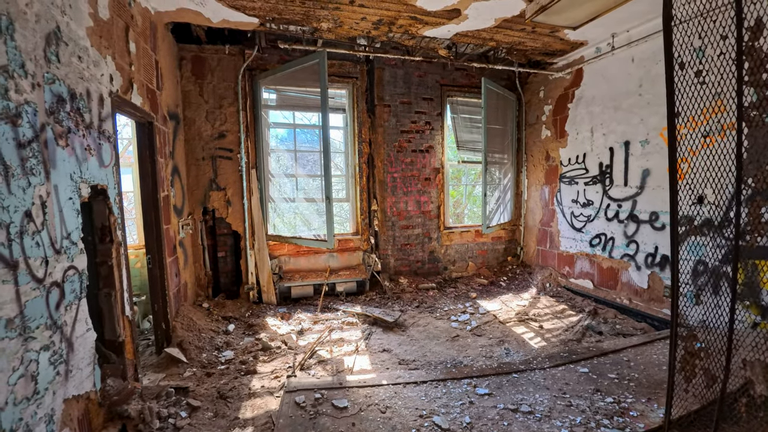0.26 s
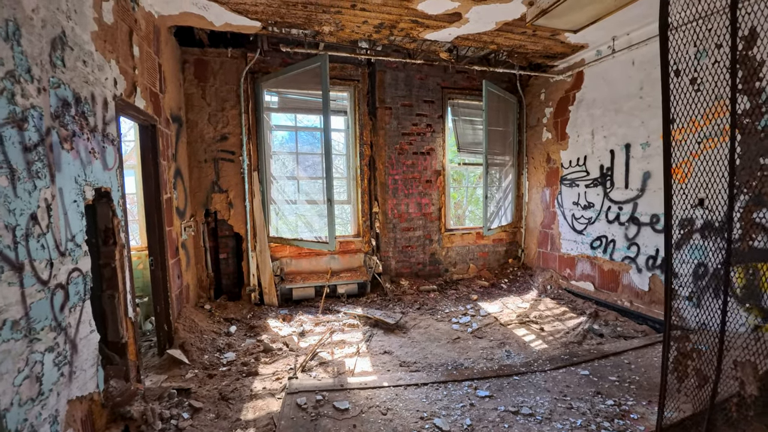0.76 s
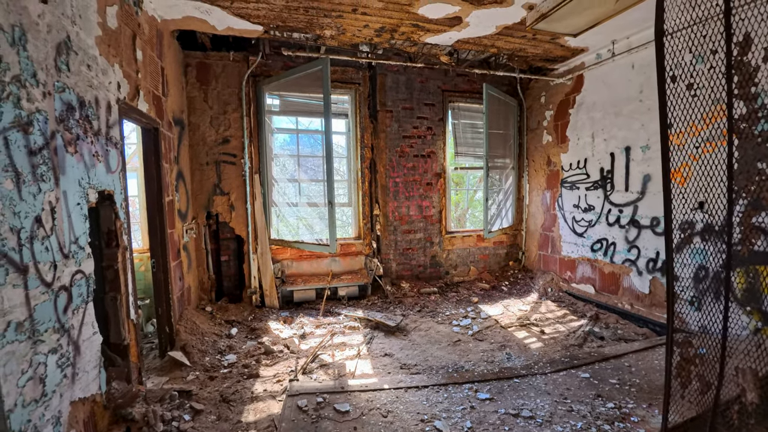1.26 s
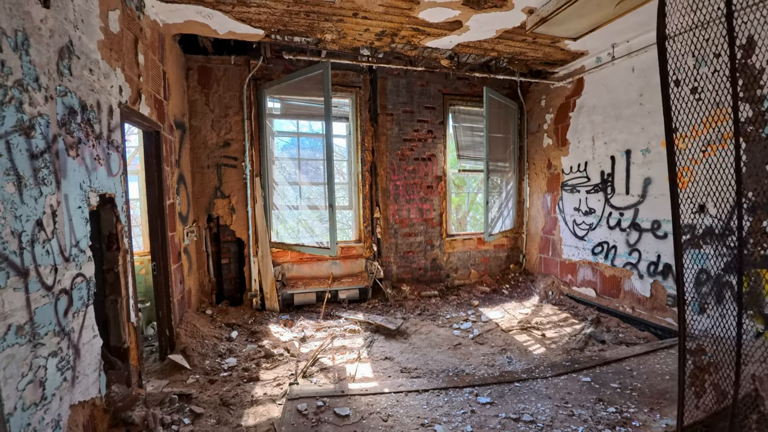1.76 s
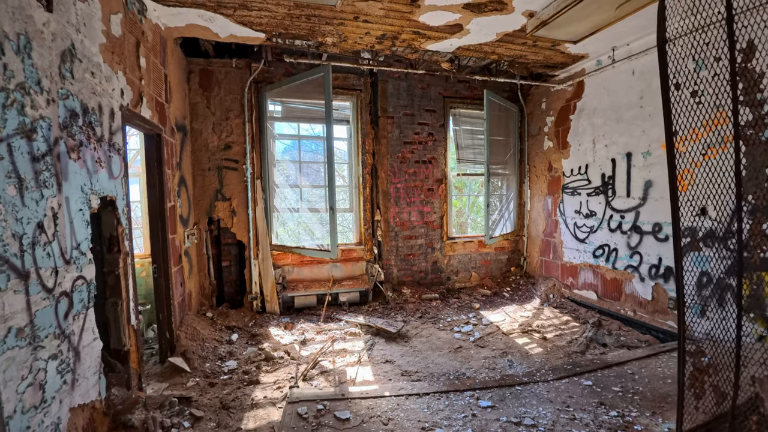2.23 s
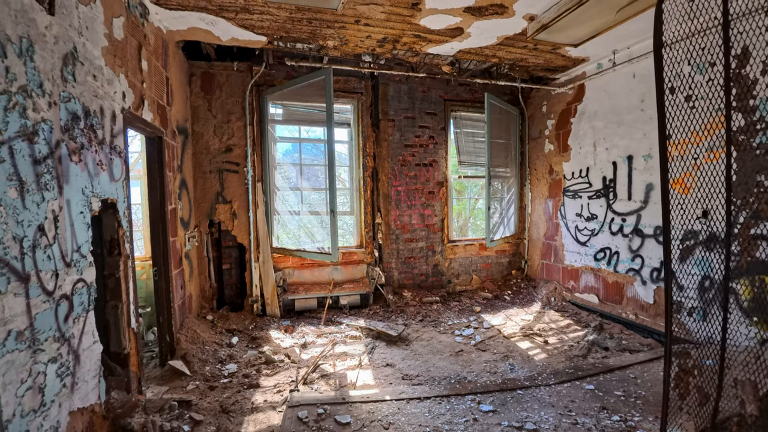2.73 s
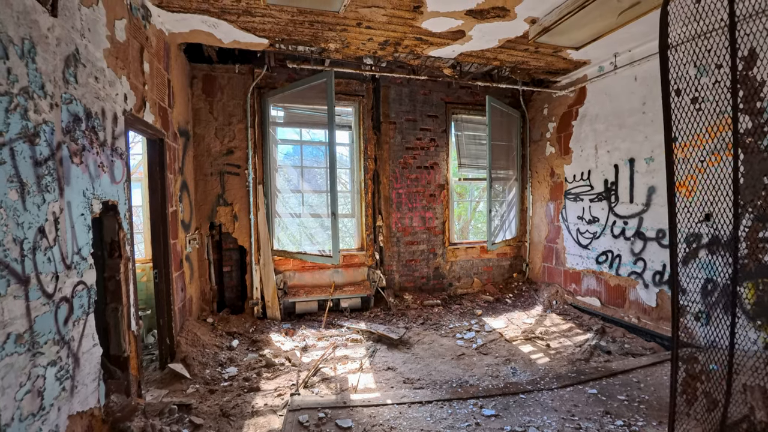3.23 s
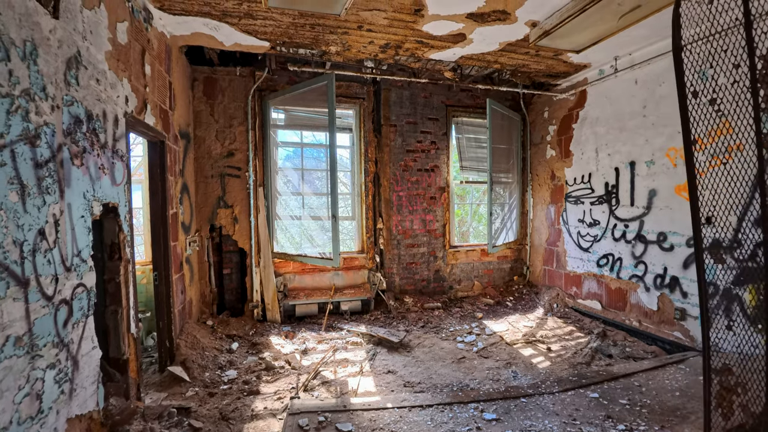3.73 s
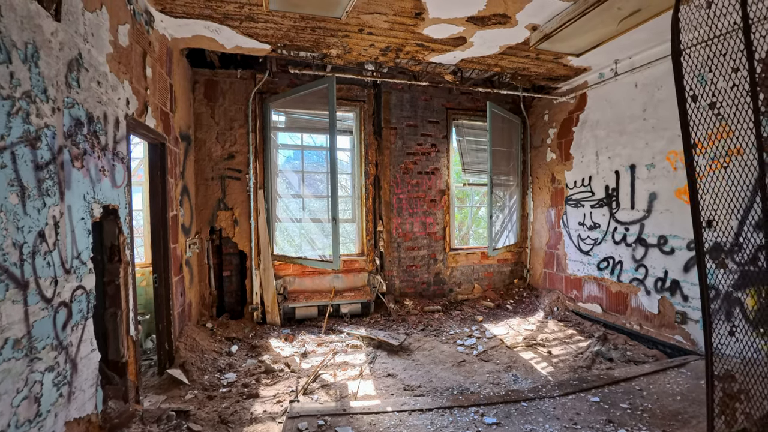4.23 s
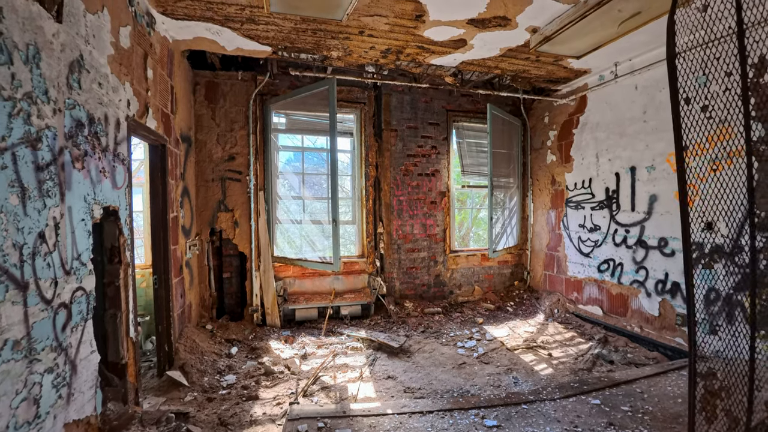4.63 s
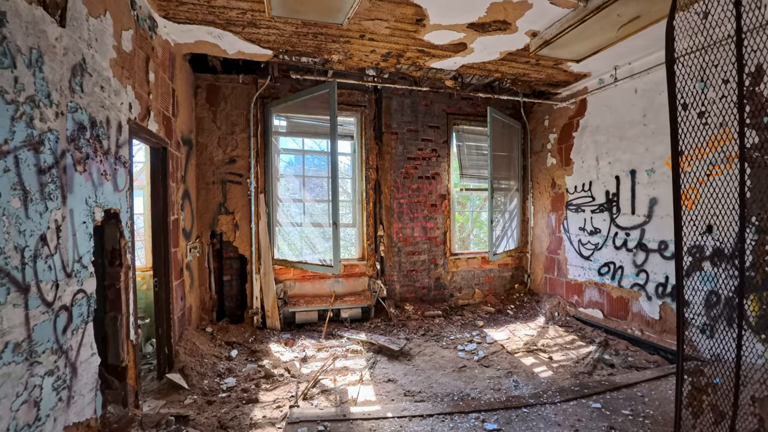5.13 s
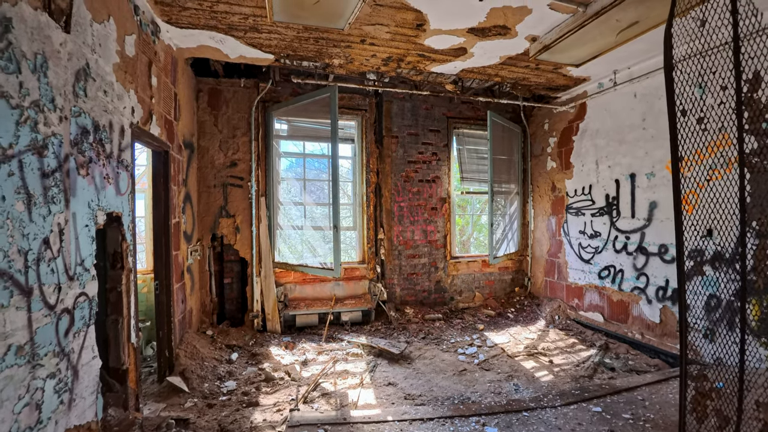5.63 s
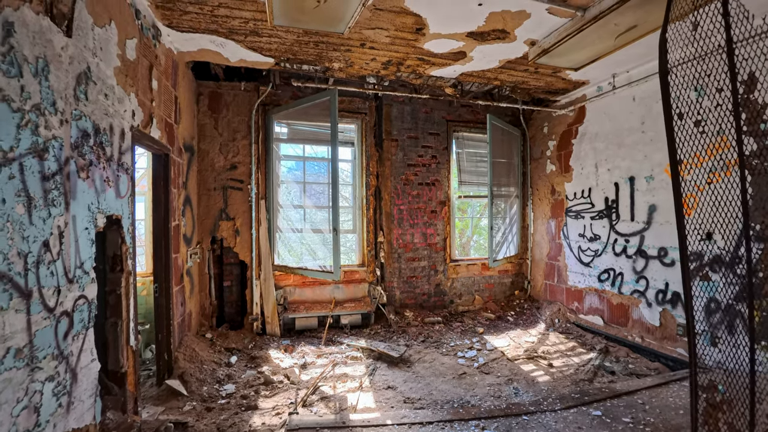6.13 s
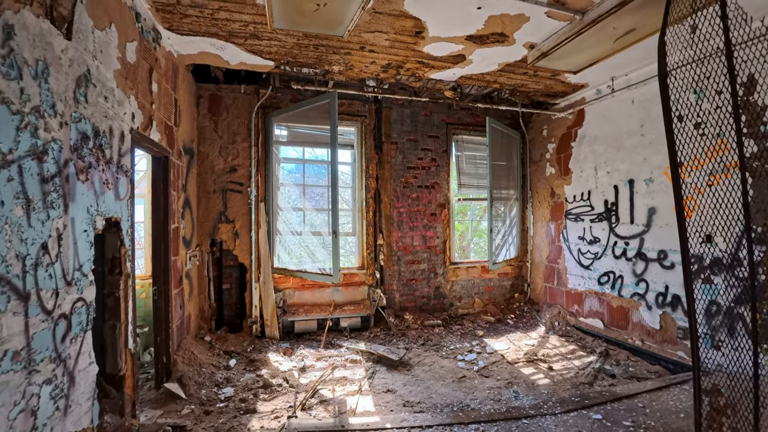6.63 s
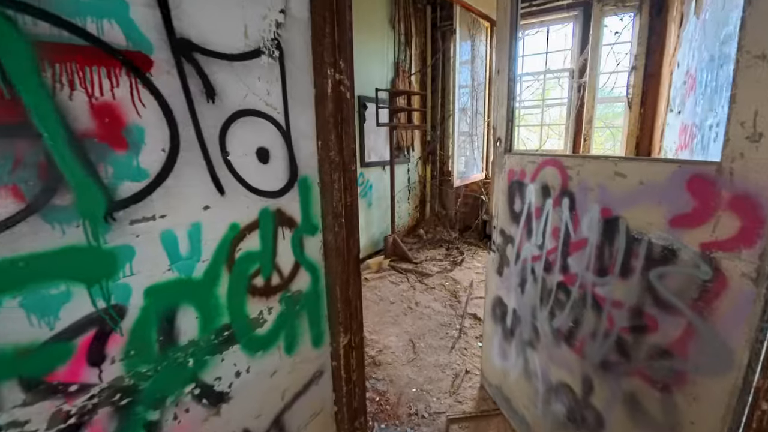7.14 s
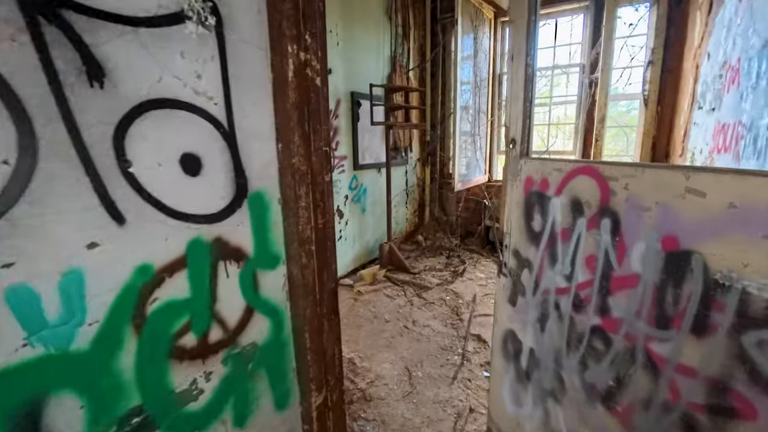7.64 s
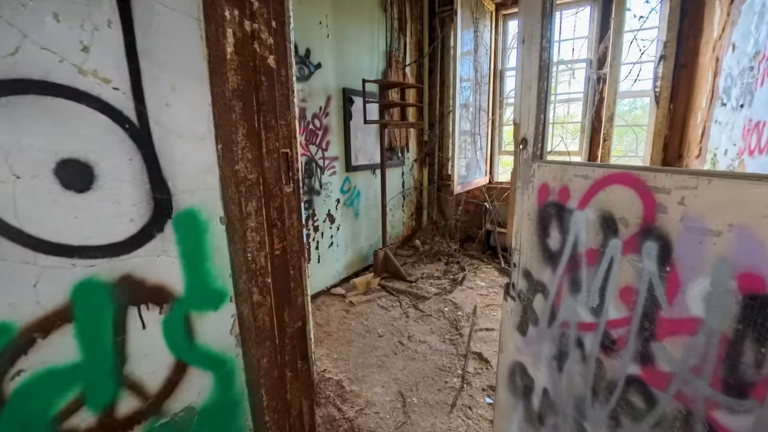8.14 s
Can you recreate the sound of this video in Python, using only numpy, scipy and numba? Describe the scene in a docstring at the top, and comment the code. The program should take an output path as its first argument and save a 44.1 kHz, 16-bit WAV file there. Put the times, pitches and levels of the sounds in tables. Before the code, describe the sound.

Someone walks over broken plaster in a bare ruined room: a sharp hollow crunch early, then faint grit slides and scuffs. Wind on the unprotected stereo microphone soon drowns everything in deep, flapping thumps, mostly on the left. A rocked chunk knocks near three seconds, another crunch comes past four, and finally the wind and hiss drop away, leaving small dry ticks.

```python
"""Footsteps on fallen plaster in a draughty ruin

Someone walks over plaster rubble in an empty building: soles slide on grit, crush flakes, rock chunks.
A draught, far louder than the steps, buffets two microphone ports separately: noise whose low-pass
corner follows the eddies, plus pressure pulses. Steps are streams of tiny fractures through resonances.
Behind lie a fracture-grain hiss and a low noise murmur from outdoors; resonated noise squeaks thinly.
Near the end the hiss dies and a few chips tick: short noise bursts ringing in their modes."""
import sys
import numpy as np
from scipy import signal
from scipy.fft import rfft, irfft, next_fast_len
from scipy.io import wavfile
from scipy.ndimage import uniform_filter1d, minimum_filter1d
from numba import njit

SR = 44100
rng = np.random.default_rng(int(sys.argv[2]) if len(sys.argv) > 2 else 0)


def wav_out(sig):
    """Save sig, one row per channel (or a flat mono array), as 16-bit PCM at SR to the path in sys.argv[1]."""
    wavfile.write(sys.argv[1], SR, np.round(np.clip(np.atleast_2d(sig).T, -1, 1) * 32767).astype(np.int16))


N = 369999
TIME = np.arange(N) / SR
PORT_LAG_S = 0.00009  # the left port hears the scene later

# flakes crushed: (start [s], level [dB], hold [s], decay [s], strongest ring [Hz],
# fall away from there [dB/octave], grit re level [dB])
CRUNCHES = [(0.387, -34, 0.0086, 0.0061, 1890, 3, -21), (0.395, -32.5, 0.018, 0.011, 530, 4, -10.5),
            (0.44, -40.5, 0.014, 0.015, 586, 3, -3), (4.26, -34.5, 0.021, 0.011, 1480, 4.5, -11.5),
            (7.73, -53.5, 0.015, 0.021, 1150, 18, -4)]
CRUNCH_RISE_S = 0.008
# hollow resonances of crushed plaster: (frequency [Hz], width [Hz], level [dB])
CRUNCH_MODES = [(516, 74, 6.5), (773, 60, 1.5), (965, 55, 2.5), (1332, 64, 0.5), (1495, 150, -0.5),
                (1694, 110, 0.5), (1884, 100, -3), (2240, 87, 2), (2445, 150, -8.5), (2850, 220, -6),
                (3480, 65, -8.5)]


def from_db(db):
    """Decibels to gain."""
    return 10 ** (np.asarray(db) / 20)


def rms_one(x):
    """Scale to an rms of 1."""
    return x / np.sqrt(np.mean(x ** 2) + 1e-20)


def in_time(rows):
    """Interpolate each column of a table over TIME."""
    s, *columns = np.transpose(rows)
    return [np.interp(TIME, s, column) for column in columns]


def at_hz(points, hz):
    """Read a spectrum on a log-frequency axis."""
    f, value = np.transpose(points)
    return np.interp(np.log(np.maximum(hz, 1)), np.log(f), value)


def filtered(x, order, hz, kind="low"):
    """Butterworth filter."""
    return signal.sosfilt(signal.butter(order, hz, kind, fs=SR, output="sos"), x)


def span(start_s, end_s):
    """Sample slice between two times."""
    return slice(int(start_s * SR), int(end_s * SR))


def coloured(pair, spectrum):
    """Colour two unrelated signals into stereo: alike in the bass, diffuse in the treble."""
    # (frequency [Hz], left-right correlation [-1 to 1])
    likeness = [(60, 1), (130, 0.96), (630, 0.97), (1370, 0.9), (3000, 0.19), (14000, 0.094)]
    size = next_fast_len(N)
    hz = np.arange(size // 2 + 1) * SR / size
    mid, side = rfft(pair, size) * from_db(at_hz(spectrum, hz))
    alike = np.clip(at_hz(likeness, hz), -1, 1)
    ports = np.sqrt(1 + alike) * mid + np.sqrt(1 - alike) * side * [[1], [-1]]
    ports[0] *= np.exp(-2j * np.pi * hz * PORT_LAG_S)
    return rms_one(irfft(ports, size)[:, :N])


def resonate(x, modes):
    """Parallel two-pole resonances with alternating signs, scaled to an rms of 1."""
    out = 0
    for k, (hz, width_hz, db) in enumerate(modes):
        r = np.exp(-np.pi * width_hz / SR)
        poles = [1, -2 * r * np.cos(2 * np.pi * hz / SR), r * r]
        gain = (-1) ** k * from_db(db) * (1 - r * r) / 2
        out = out + gain * signal.lfilter([1, 0, -1], poles, x)
    return rms_one(out)


def grains(per_s, spread_db):
    """Two streams of tiny fractures, most small and a few large."""
    sizes = from_db(spread_db * np.minimum(rng.exponential(1, (2, N)), 4))
    happens = rng.random((2, N)) < per_s / SR
    return happens * sizes * rng.choice([-1, 1], (2, N))


def drift(corner_hz):
    """Smooth random curve of rms 1: noise through a double pole."""
    knots_per_s = 400
    knots = rng.standard_normal(int(N / SR * knots_per_s))
    r = np.exp(-2 * np.pi * corner_hz / knots_per_s)
    slow = rms_one(signal.lfilter([1], [1, -2 * r, r * r], knots))
    return np.interp(TIME, np.linspace(0, TIME[-1], len(slow)), slow)


def room(x, t60_s, wet_db, wall_hz):
    """Bare walls return a short, dull tail of decaying noise."""
    t = TIME[:SR // 2]
    tail = rng.standard_normal((2, len(t))) * from_db(-60 * t / t60_s) * (t > 0.008)
    tail = filtered(tail / np.sqrt(np.sum(tail ** 2) / 2), 1, wall_hz)
    return x + from_db(wet_db) * signal.fftconvolve(x, tail, axes=1)[:, :N]


@njit
def moving_low_pass(x, step, damping):
    """A two-pole low-pass whose corner moves from sample to sample."""
    out, low, band = np.zeros(len(x)), 0., 0.
    for i in range(len(x)):
        low += step[i] * band
        band += step[i] * (x[i] - low - damping * band)
        out[i] = low
    return out


def lulls(port):
    """Brief dips of the draught at this port, in dB."""
    # (centre [s], port)
    lull_times = [(0.9, "left"), (1.155, "left"), (1.92, "right"), (2.19, "right"), (2.28, "right"),
                  (2.71, "right"), (2.805, "right"), (3.925, "left"), (4.07, "left"), (4.205, "left"),
                  (4.316, "left"), (4.71, "left"), (4.83, "left"), (4.945, "left"), (5.07, "left"),
                  (5.265, "left"), (5.354, "left"), (5.45, "left"), (5.625, "left"), (5.967, "left"),
                  (6.185, "left"), (6.36, "left"), (6.453, "left"), (6.54, "left"), (6.767, "left")]
    depth_db, half_length_s = -8, 0.014
    dips = [np.exp(-((TIME - s) / half_length_s) ** 2) for s, side in lull_times if side == port]
    return depth_db * np.max(dips, axis=0)


def eddies_on(port, draught_db):
    """Big eddies of this port and a random train of small ones that follow the draught."""
    # (centre [s], level [dB], length [s], port)
    big_eddies = [(0.834, -20, 0.02, "right"), (0.882, -16, 0.011, "right"), (1.118, -14, 0.016, "right"),
                  (1.143, -19, 0.029, "right"), (1.167, -14.5, 0.016, "right"), (1.608, -18, 0.036, "left"),
                  (1.648, -15.5, 0.022, "left"), (1.704, -15, 0.0088, "left"), (1.832, -23, 0.018, "right"),
                  (1.874, -9.5, 0.027, "left"), (1.902, -13.5, 0.012, "left"), (1.941, -9, 0.044, "left"),
                  (2.019, -12.5, 0.042, "left"), (2.189, -15, 0.0097, "left"), (2.232, -13, 0.008, "left"),
                  (2.243, -17.5, 0.0068, "left"), (2.29, -21, 0.013, "left"), (2.411, -13.5, 0.03, "right"),
                  (2.615, -21.5, 0.042, "right"), (2.83, -18, 0.025, "right"), (2.928, -24, 0.013, "right"),
                  (3.047, -22.5, 0.037, "right"), (3.191, -19, 0.016, "left"), (3.473, -23, 0.032, "left"),
                  (3.516, -21, 0.022, "left"), (3.965, -22, 0.02, "left"), (4.15, -18.5, 0.014, "left"),
                  (4.344, -15, 0.016, "left"), (4.462, -15.5, 0.021, "left"), (4.507, -32, 0.0043, "left"),
                  (4.532, -14, 0.027, "left"), (4.579, -17, 0.068, "left"), (4.774, -19.5, 0.042, "left"),
                  (4.867, -14, 0.0091, "left"), (4.907, -17, 0.03, "left"), (5.01, -20.5, 0.02, "left"),
                  (5.113, -14.5, 0.026, "left"), (5.194, -16, 0.031, "left"), (5.313, -14.5, 0.024, "left"),
                  (5.415, -16, 0.0078, "left"), (5.483, -16, 0.035, "left"), (5.522, -14, 0.04, "left"),
                  (5.582, -16.5, 0.026, "left"), (5.751, -17.5, 0.018, "left"),
                  (6.042, -23.5, 0.024, "left"), (6.059, -16, 0.021, "left"), (6.122, -15, 0.029, "left"),
                  (6.21, -11.5, 0.012, "left"), (6.232, -15, 0.021, "left"), (6.265, -18, 0.022, "left"),
                  (6.487, -16.5, 0.013, "left"), (6.518, -17.5, 0.019, "left"),
                  (6.59, -12.5, 0.018, "left"), (6.647, -15, 0.057, "left"), (6.705, -17, 0.022, "left"),
                  (6.872, -19.5, 0.068, "left"), (7.157, -25, 0.028, "left"), (7.694, -20, 0.017, "left"),
                  (7.774, -22.5, 0.02, "left")]
    small_per_s, small_s, over_draught_db, spread_db = 18, 0.0089, 5.5, 4
    chance = rng.standard_normal((200, 3))
    times = np.cumsum(np.exp(0.4 * chance[:, 0]) / small_per_s)
    levels_db = np.interp(times, TIME, draught_db) + over_draught_db + spread_db * chance[:, 1]
    lengths_s = small_s * np.exp(0.3 * chance[:, 2])
    small = [eddy for eddy in zip(times, levels_db, lengths_s) if eddy[0] < TIME[-1]]
    return small + [(s, db, length_s) for s, db, length_s, side in big_eddies if side == port]


def knocks(port):
    """A tight whirl's core is one smooth pressure pulse of random shape; tighter whirls knock higher."""
    # (centre [s], level [dB], pitch [Hz], port)
    whirls = [(0.833, -15.5, 202, "right"), (1.115, -11.5, 190, "right"), (1.137, -11, 215, "right"),
              (1.174, -6.5, 219, "right"), (1.669, -20, 175, "left"), (1.705, -7, 150, "left"),
              (1.864, -1.5, 176, "left"), (1.884, -1.5, 260, "left"), (1.926, -7, 330, "left"),
              (1.943, -7.5, 335, "left"), (1.951, -7, 355, "left"), (2.004, -5.5, 272, "left"),
              (2.043, -13, 171, "left"), (2.079, -10, 156, "left"), (2.163, -11, 165, "left"),
              (2.212, -8.5, 180, "left"), (2.284, -12, 153, "left"), (2.382, -19, 215, "right"),
              (2.412, -9, 263, "right"), (2.613, -15.5, 145, "right"), (2.838, -13, 141, "right"),
              (3.064, -13.5, 155, "right"), (3.153, -14.5, 160, "left"), (3.488, -7.5, 147, "left"),
              (4.293, -19.5, 138, "left"), (4.342, -10, 116, "left"), (4.402, -12, 110, "left"),
              (4.529, -10.5, 175, "left"), (4.589, -10.5, 141, "left"), (4.776, -6.5, 112, "left"),
              (4.901, -4.5, 148, "left"), (4.91, -17, 190, "left"), (5.017, -13, 132, "left"),
              (5.109, -4.5, 159, "left"), (5.119, -8.5, 156, "left"), (5.164, -7, 161, "left"),
              (5.191, -10, 215, "left"), (5.297, -9, 146, "left"), (5.311, -9, 184, "left"),
              (5.326, -12.5, 150, "left"), (5.479, -15, 183, "left"), (5.513, -6.5, 162, "left"),
              (5.543, -10, 154, "left"), (5.845, -15.5, 167, "left"), (6.032, -10, 152, "left"),
              (6.098, -10.5, 139, "left"), (6.124, -12, 160, "right"), (6.163, -13, 150, "left"),
              (6.207, -7.5, 187, "left"), (6.34, -16.5, 163, "left"), (6.485, -20, 129, "left"),
              (6.56, -7, 139, "right"), (6.591, -25, 150, "left"), (6.629, -9, 195, "left"),
              (6.654, -16, 157, "left"), (6.741, -17.5, 155, "left"), (7.697, -18.5, 140, "left"),
              (7.785, -15.5, 141, "left")]
    out = np.zeros(N)
    for (s, db, hz, side), turn in zip(whirls, rng.random(len(whirls))):
        if side == port:
            near = span(s - 10 / hz, s + 10 / hz)
            pulse = np.exp(2j * np.pi * turn) / (1 - 1j * np.pi * hz * (TIME[near] - s)) ** 3
            out[near] += from_db(db) * pulse.real
    return out


def buffeting(port, draught, eddy_hz):
    """Turbulence at one port: harder air makes smaller whirls, so the rumble reaches higher."""
    steady_db, trim_db = 4.0, 1.5
    calm_corner_hz, calm_db, db_per_octave = 83, -46, 26
    typical_eddy_db, eddy_db_per_octave = -14.5, 5
    damping, top_hz, low_cut_hz, leak_hz, even_s = 1.255, 330, 33, 29, 0.03

    level_db = in_time(draught)[0] + lulls(port)
    power = from_db(level_db + steady_db) ** 2
    # corner is power-weighted until divided by power
    corner = power * calm_corner_hz * 2 ** ((level_db - calm_db) / db_per_octave)
    for s, db, length_s in eddies_on(port, level_db):
        near = slice(max(int((s - 2 * length_s) * SR), 0), int((s + 2 * length_s) * SR))
        # abrupt arrival and departure
        swell = from_db(db) ** 2 * np.exp(-np.abs(1.8 * (TIME[near] - s) / length_s) ** 4)
        rise = 2 ** ((db - typical_eddy_db) / eddy_db_per_octave)
        power[near] += swell
        corner[near] += swell * (calm_corner_hz + (eddy_hz - calm_corner_hz) * rise)

    # flutter: each quick surge is both brighter and stronger
    surge = from_db(1.7 * drift(70))
    step = 2 * np.pi * np.minimum(surge * corner / power, top_hz) / SR
    flow = rng.standard_normal(N) / np.sqrt(step)
    flow = moving_low_pass(moving_low_pass(flow, step, damping), step, damping)
    flow = filtered(flow, 2, low_cut_hz, "high")

    # even out the noise so that the eddies set its strength
    size = int(even_s * SR)
    flow_power = flow ** 2
    for _ in range(3):
        flow_power = uniform_filter1d(flow_power, size)
    strength = np.sqrt(flow_power + 1e-12)
    pressure = from_db(trim_db) * np.sqrt(power * surge) * flow / strength + knocks(port)
    return filtered(pressure, 2, leak_hz, "high")


def air():
    """Fine restless hiss, a little to the right, with two wavering resonances, over an outdoor murmur."""
    # (frequency [Hz], density [dB/Hz])
    hiss_colour, murmur_colour = [(500, -15.5), (1000, -0.5), (1350, -3), (2000, -2.5), (2900, 0.5),
                                  (3900, -3.5), (5000, -4), (7600, -7), (10500, -14.5), (14000, -21.5)], [(55, 9.5), (130, 5), (330, -4), (480, -8), (610, -5.5),
                                                (850, -14.5), (1200, -24), (2500, -51)]
    # (frequency [Hz], width [Hz], level [dB])
    hiss_modes = [(1724, 61, 9.5), (4890, 120, 1.5)]
    # (time [s], level [dB])
    hiss_level, murmur_level = [(0, -50), (0.55, -52), (0.9, -55), (2.2, -59), (3.15, -59.5), (4.5, -56.5),
                                (5.6, -60), (7.4, -55), (7.76, -60), (7.98, -79), (8.39, -80)], [(0, -40), (0.55, -40.5), (0.95, -41), (2.4, -45),
                                                    (3.4, -44), (5.2, -45), (7.5, -47.5), (8.39, -51.5)]
    # resonances against the hiss: (time [s], level [dB])
    ring_level = [(0, -3.5), (1.8, -4.5), (2.1, -8), (2.45, -1), (2.8, -6), (3.0, -3.5), (3.4, -12),
                  (3.65, -8), (4.0, -11.5), (5.15, -8), (5.5, -8), (5.7, -9), (6.4, -11)]
    # hollow just below the lower resonance: (time [s], depth [0-1])
    hollow_depth = [(4.4, 0), (4.85, 0.5), (6.2, .75), (7.0, 0.4)]
    hiss_gain_db, right_db, hollow_hz, pitch_wander = 1.0, 1.07, (1260, 1500), 0.012

    hiss_db, = in_time(hiss_level)
    murmur_db, = in_time(murmur_level)
    ring_db, = in_time(ring_level)
    hollow, = in_time(hollow_depth)
    flicker = from_db(hiss_gain_db + 1.07 * drift(20.0))
    hiss = flicker * coloured(grains(per_s=18000, spread_db=3.5), hiss_colour)

    ring = resonate(coloured(rng.standard_normal((2, N)), hiss_colour), hiss_modes)
    bent_time = TIME + np.cumsum(pitch_wander * drift(5)) / SR
    waver = from_db(2.5 * drift(9))
    hiss += from_db(ring_db) * waver * [np.interp(bent_time, TIME, side) for side in ring]
    hiss -= np.clip(hollow, 0, 1) * filtered(hiss, 1, hollow_hz, "band")

    murmur = coloured(rng.standard_normal((2, N)), murmur_colour)
    placed_hiss = from_db(hiss_db) * hiss * from_db([[-right_db], [right_db]])
    return placed_hiss + from_db(murmur_db) * murmur


def press(s, db, rise_s, decay_s, hold_s=0):
    """Weight builds evenly, may rest, then eases away."""
    load, near = np.zeros(N), span(s, s + 1)
    t = np.maximum(TIME[near] - s, 0)
    release = np.exp(-np.maximum(t - rise_s - hold_s, 0) / decay_s)
    load[near] = from_db(db) * np.minimum(t / rise_s, 1) * release
    return load


def crunches():
    """Flakes give way in uneven runs of cracks that ring the plaster, each strongest near its own pitch."""
    # (frequency [Hz], density [dB/Hz])
    crack_colour = [(200, -21), (450, 9.5), (2500, 2.0), (3500, -11.5), (6000, -9.5)]
    cracks = coloured(grains(per_s=1100, spread_db=1.5), crack_colour)
    out = np.zeros((2, N))
    for s, db, hold_s, decay_s, focus_hz, fall_db, _ in CRUNCHES:
        near = span(s, s + 0.5)
        load = press(s, db, CRUNCH_RISE_S, decay_s, hold_s)[near]
        ring = 0
        for hz, width_hz, mode_db in CRUNCH_MODES:
            mode_gain = from_db(mode_db - fall_db * abs(np.log2(hz / focus_hz)))
            ring = ring + mode_gain * resonate(load * cracks[:, near], [(hz, width_hz, 0)])
        out[:, near] += rms_one(ring) * np.sqrt(np.mean(load ** 2))
    return out


def footsteps():
    """Under the weight sand grinds brightly, flakes break with a hollow ring, the sole rubs dully."""
    # sole sliding on sand: (start [s], level [dB], decay [s], breaking flakes re level [dB])
    slides = [(0.018, -45.5, 0.021, -7), (0.297, -39.5, 0.093, -6), (0.726, -47.5, 0.072, -9),
              (0.95, -52, 0.12, -5), (1.362, -49.5, 0.013, -21), (1.799, -50, 0.031, -19),
              (2.324, -55, 0.063, -19), (2.485, -57.5, 0.081, -7), (2.93, -55, 0.077, -20),
              (3.285, -54.5, 0.047, -3), (3.6, -52, 0.033, -8), (4.855, -58, 0.027, -21),
              (5.15, -60.5, 0.066, 6), (5.63, -56, 0.087, -22)]
    # sole dragging over rubble: (start [s], level [dB], rise [s], decay [s], flakes re level [dB])
    scuffs = [(1.13, -36, 0.051, 0.085, -21), (3.19, -49.5, 0.026, 0.091, -7),
              (3.29, -54, 0.061, 0.068, -20), (7.39, -50, 0.095, 0.0062, -6)]
    # (frequency [Hz], density [dB/Hz])
    grit_colour, scuff_colour = [(400, -54), (900, -4.5), (1900, 4), (3600, -2), (5000, 1), (8100, -1),
                                 (11000, -7.5), (14500, -18)], [(150, -16), (300, 8.5), (500, -4), (750, 1), (1000, -7),
                                               (1400, -13.5), (2000, -12.5), (2900, -13), (3800, -23),
                                               (14000, -55)]
    flake_colour = [(200, -33), (450, -7.0), (3000, 2.5), (6000, -4.0)]
    rise_per_decay, thump_db = 0.3, -4

    grinding, breaking, rubbing = np.zeros((3, N))
    for s, db, decay_s, flakes_db in slides:
        load = press(s, db, rise_per_decay * decay_s, decay_s)
        grinding += load
        breaking += from_db(flakes_db) * load
    for s, db, hold_s, decay_s, _, _, grit_db in CRUNCHES:
        grinding += press(s, db + grit_db, CRUNCH_RISE_S, decay_s, hold_s)
    for s, db, rise_s, decay_s, flakes_db in scuffs:
        load = press(s, db, rise_s, decay_s)
        rubbing += load
        breaking += from_db(flakes_db) * load

    grit = coloured(grains(per_s=25000, spread_db=4.3), grit_colour)
    flakes = coloured(grains(per_s=3100, spread_db=7.0), flake_colour)
    scuff = coloured(grains(per_s=5700, spread_db=3.5), scuff_colour)
    # the soft sole wakes mainly the low plaster resonances
    scuff = scuff + from_db(thump_db) * resonate(scuff, CRUNCH_MODES)
    steps = grinding * grit + breaking * resonate(flakes, CRUNCH_MODES) + rubbing * scuff + crunches()
    return room(steps, t60_s=0.58, wet_db=-6.0, wall_hz=4500)


def chunks():
    """A rocked plaster chunk knocks hollowly: one damped tone with a weaker overtone."""
    # (start [s], level [dB], pitch [Hz], swell [s])
    rocked_chunks = [(2.967, -38, 480, 0.0038), (2.976, -43, 770, 0.0047), (2.983, -36, 496, .004),
                     (3.014, -40, 447, 0.0027), (7.737, -50, 1195, 0.0049), (7.781, -46, 420, .0035)]
    overtone_ratio, overtone_db = 1.9, -9
    out = np.zeros((2, N))
    for s, db, hz, swell_s in rocked_chunks:
        near = span(s, s + 0.1)
        t = np.maximum(TIME[near] - s - [[PORT_LAG_S], [0]], 0)
        tone = np.sin(2 * np.pi * hz * t)
        tone += from_db(overtone_db) * np.sin(2 * np.pi * overtone_ratio * hz * t)
        envelope = (t / swell_s * np.exp(1 - t / swell_s)) ** 2
        out[:, near] += from_db(db) * envelope * tone
    return room(out, t60_s=0.18, wet_db=-1.5, wall_hz=4500)


def squeak():
    """A thin, unsteady tone: noise through a narrow resonance twice, swelling and fading."""
    # (peak time [s], level [dB], swell and fade [s])
    squeaks = [(5.763, -52.5, 0.0069), (7.735, -58, 0.048)]
    level = sum(from_db(db) * np.exp(-np.abs(TIME - s) / fade_s) for s, db, fade_s in squeaks)
    mode = [(4680, 220, 0)]  # (frequency [Hz], width [Hz], level [dB])
    return level * resonate(resonate(rng.standard_normal((2, N)), mode), mode)


def chips():
    """Each plaster chip gives a short dry crack that rings in its modes."""
    # (start [s], level [dB])
    ticks = [(7.994, -41.5), (8.0332, -38), (8.058, -43.5), (8.3, -59)]
    # (frequency [Hz], width [Hz], level [dB])
    chip_modes = [(1430, 630, -8), (2880, 410, -0.5), (3540, 240, -15), (6250, 1600, -23)]
    level_db, snap_db, crack_s = -6, -4, 0.0036
    touch = np.zeros(N)
    for s, db in ticks:
        touch += from_db(db) * (TIME >= s) * np.exp(-np.abs(TIME - s - crack_s / 2) / crack_s)
    crack = touch * rng.standard_normal((2, N)) + 1e-18
    snap = rms_one(filtered(crack, 2, [2500, 7500], "band"))
    tick = from_db(level_db) * crack.std() * (resonate(crack, chip_modes) + from_db(snap_db) * snap)
    return room(tick, t60_s=0.11, wet_db=-8, wall_hz=5000)


def scene():
    """Steps and air reach both ports; the wind strikes each on its own."""
    # draught on each port: (time [s], level [dB])
    draught_left, draught_right = [(0, -48), (0.32, -55.5), (0.88, -41), (1.1, -31.5), (1.45, -36),
                                   (1.64, -35), (2.28, -23), (2.38, -48), (2.7, -30.5), (2.92, -45),
                                   (3.16, -28), (3.74, -57), (3.88, -32), (4.1, -39), (4.43, -25),
                                   (4.682, -38.5), (5.0, -26), (5.67, -39.5), (5.76, -31.5), (6.851, -28.5),
                                   (6.99, -43.5), (7.79, -39), (7.87, -57), (8.39, -49.5)], [(0.0, -57), (0.56, -69), (1.16, -26), (1.52, -49),
                                                         (1.719, -75.5), (1.8, -38.5), (3.0, -33.5),
                                                         (3.72, -63), (3.96, -38), (4.71, -58), (5.87, -51),
                                                         (6.27, -27), (6.43, -44.5), (6.63, -26.5),
                                                         (6.91, -56.5), (7.27, -45.5), (7.95, -52.5),
                                                         (8.39, -64)]
    wind_left = buffeting("left", draught_left, eddy_hz=180)
    wind_right = buffeting("right", draught_right, eddy_hz=224)
    wind = np.array([wind_left, wind_right])
    steps = footsteps() * from_db([[-1.1], [1.1]])
    return wind + air() + steps + chunks() + squeak() + chips()


def record(dry):
    """A limiter eases the biggest thumps under full scale; the top is cut steeply."""
    ceiling, size, cutoff_hz = 0.93, int(0.004 * SR), 14600
    gain = minimum_filter1d(ceiling / np.maximum(np.abs(dry), ceiling), 2 * size)
    gain = uniform_filter1d(uniform_filter1d(gain, size), size)
    top_cut = signal.ellip(10, 0.1, 80, cutoff_hz, fs=SR, output="sos")
    return signal.sosfilt(top_cut, gain * dry)


dry = scene()
out = record(dry)
wav_out(out)
```